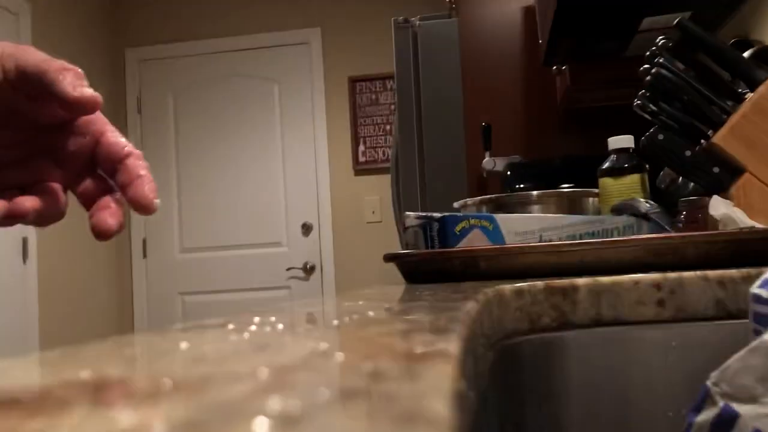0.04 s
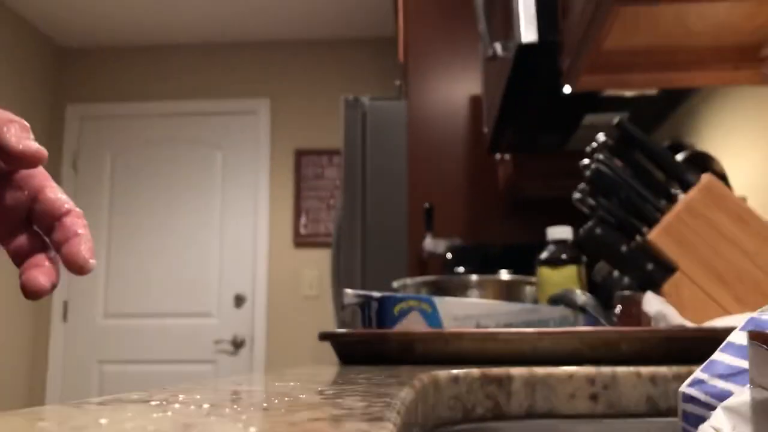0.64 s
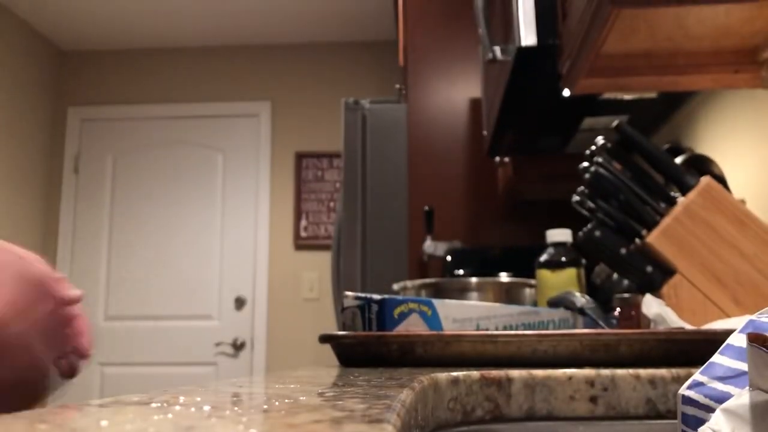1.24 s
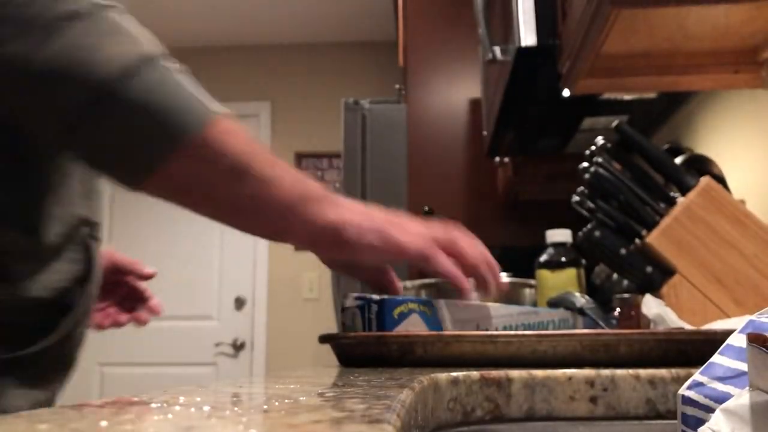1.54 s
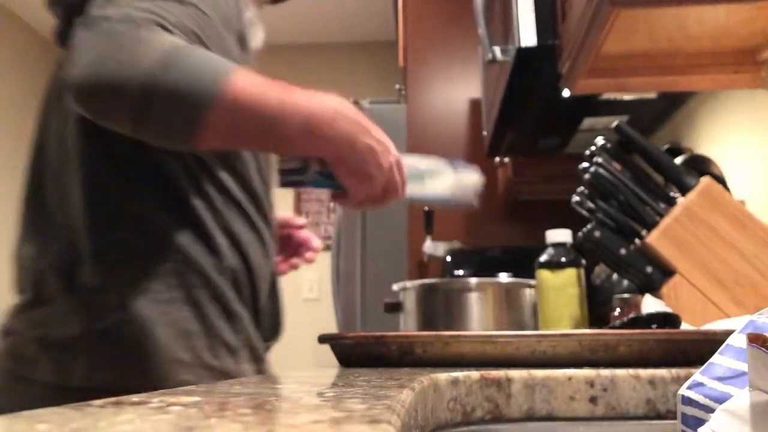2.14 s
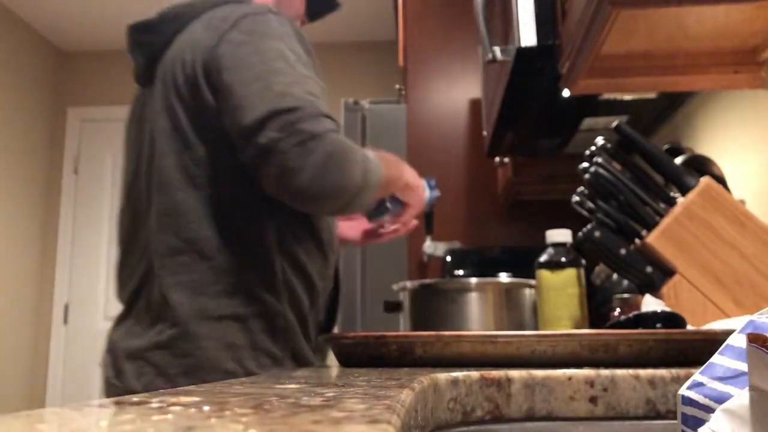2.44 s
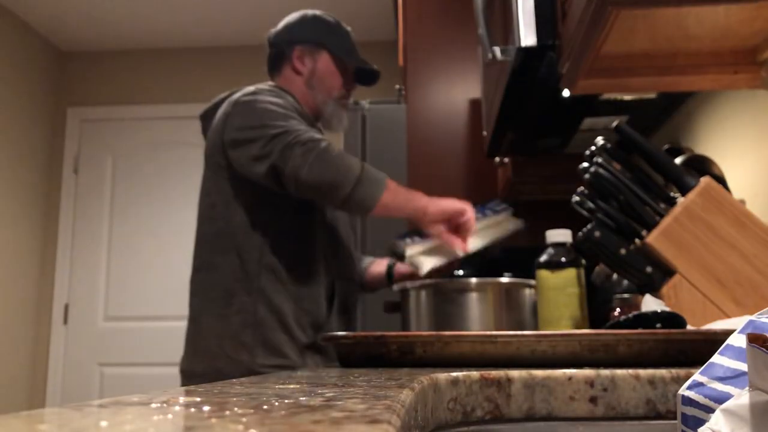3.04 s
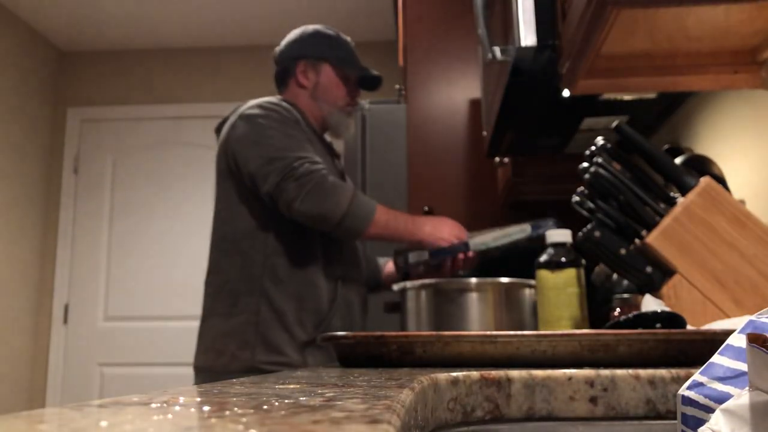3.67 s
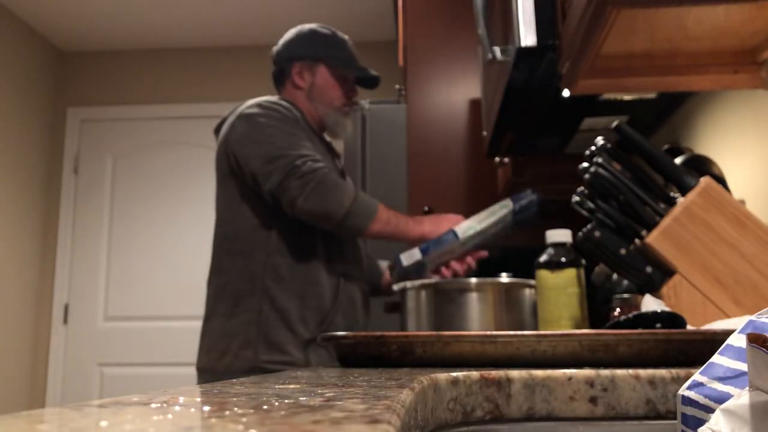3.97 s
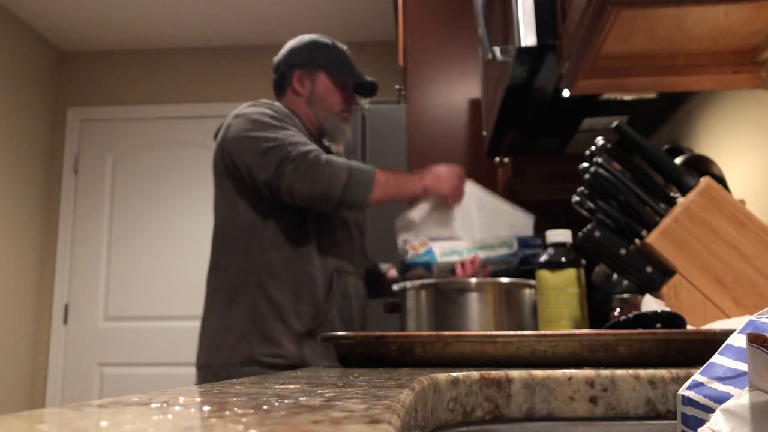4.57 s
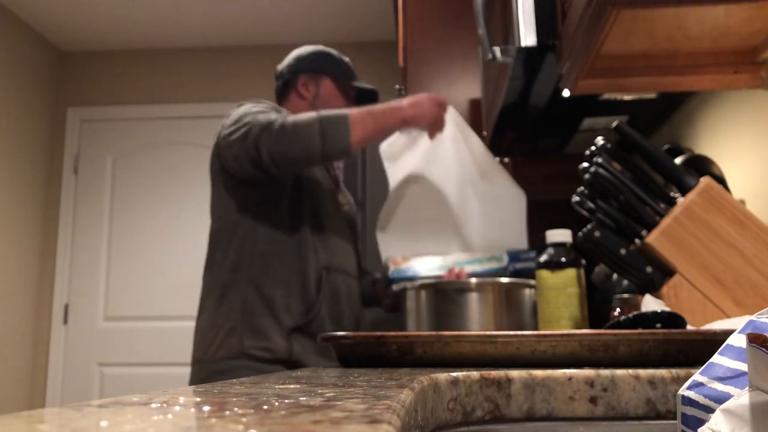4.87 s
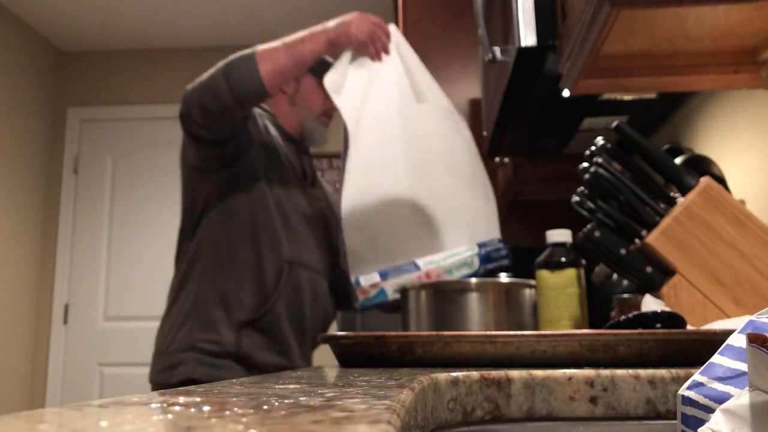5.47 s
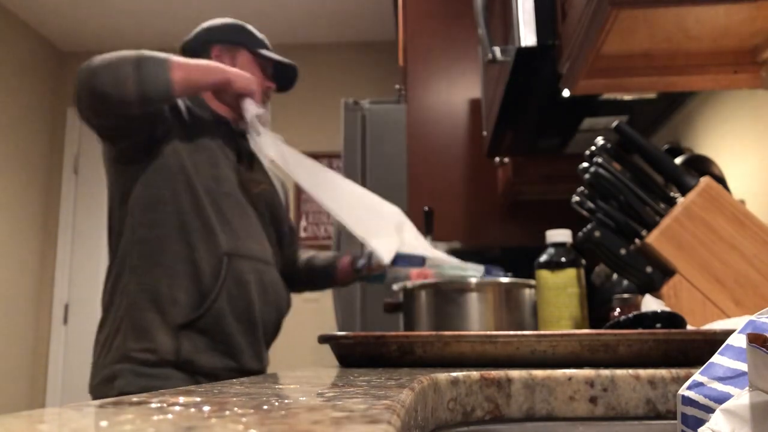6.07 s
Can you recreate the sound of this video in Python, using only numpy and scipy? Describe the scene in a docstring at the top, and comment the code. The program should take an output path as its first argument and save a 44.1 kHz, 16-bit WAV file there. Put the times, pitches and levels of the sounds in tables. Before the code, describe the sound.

A carton of baking paper is picked up with a sharp clank against a metal pan, after light handling ticks on the nearby microphone and a few dull steps. Hollow taps, scrapes and soft thuds follow as the box is turned and opened. The sheet rustles steadily out, then rips loudly along the toothed edge. A fridge hums quietly beneath it all in a slightly echoing kitchen.

```python
"""A kitchen with hard walls that ring briefly. A phone is settled on the counter; someone steps up and
lifts a carton of baking parchment, which knocks against a metal pan and sets its modes ringing.
Fingers tap and rub the hollow carton as it is turned and opened. The sheet slides off the roll in
countless tiny slips, then its fibres snap along the toothed edge. A fridge hums throughout."""
import sys
import numpy as np
from scipy import signal
from scipy.fft import rfft, irfft
from scipy.io import wavfile
from scipy.ndimage import uniform_filter1d

SR = 44100
rng = np.random.default_rng(int(sys.argv[2]) if len(sys.argv) > 2 else 0)


def persist_wave(psi):
    """Save psi, clipped to +-1, as 16-bit WAV."""
    counts = np.round(np.clip(psi, -1, 1) * 32767).astype(np.int16)
    wavfile.write(sys.argv[1], SR, np.atleast_2d(counts).T)


N = 278271
T = np.arange(N) / SR
AGE = T[:SR // 2]  # time since a blow


# tearing spectrum: f/Hz, gain/dB
RIP_SPECTRUM = [(60, -49), (120, -21), (200, -1.5), (270, -7), (390, -10), (560, -7), (950, 0.5),
                (1610, -5), (1910, -1), (2450, -4.5), (2900, 0), (7000, -2), (9500, -6), (16000, -8.5)]
# tugs along the teeth: t/s, length/s, level/dB
TUGS = [(5.85, 0.1, -42), (5.925, 0.015, -22.5), (5.97, 0.11, -13), (6.125, 0.11, -15.5),
        (6.235, 0.035, -24), (6.275, 0.05, -10.5)]
# single teeth punching through: t/s, level/dB
PUNCTURES = [(5.862, -32.5), (5.897, -32), (5.937, -28), (5.997, -26), (6.0546, -7), (6.1648, -21),
             (6.2873, -8)]

def ripping():
    """Fibres snap in bunches as the tear runs from tooth to tooth; taut sheet and carton radiate."""
    surge_db = 1.36 * walk(220) + 0.5 * walk(99)
    fibres = slips(per_s=7700, spread_db=1) * undb(surge_db)
    sheet = unit(colour(fibres, RIP_SPECTRUM))
    walls = undb(-14.5) * unit(hollow(slips(per_s=3300, spread_db=2.5)))
    flutter = undb(-25.5) * unit(resonate(cut(fibres, 310, "low"), 229, 35))
    tension = strokes(TUGS, attack_s=0.038, release_s=0.062)[0]
    out = tension * (sheet + walls + flutter)
    for t, db in PUNCTURES:
        add(out, t, undb(db) * unit_hit(cut(burst(0.027), 1400, "high")))
    return kitchen(out, wet_db=-10.5)


# pace of the pull, as a treble gain: t/s, level/dB
PULL_PACE = [(4.38, -52), (4.416, -58), (4.44, -41.5), (4.646, -37), (4.732, -42), (4.752, -38.5),
             (4.78, -43.5), (4.9, -39), (5.042, -46.5), (5.218, -33), (5.414, -42), (5.432, -39.5),
             (5.542, -50), (5.668, -38.5), (5.734, -45), (5.85, -71)]
# sliding-paper spectrum: f/Hz, gain/dB
SLIDE_SPECTRUM = [(150, -15.5), (420, -14), (900, -0.5), (2200, -1), (3000, 2.5), (4200, -0.5),
                  (6000, -1.5), (8000, -5.5), (10000, -13), (16000, -44)]
# free-sheet resonances: f/Hz, width/Hz, level/dB re hiss
SHEET_BANDS = [(1450, 810, -13), (3040, 1100, -13.5), (5600, 1700, -11)]

def unrolling():
    """The sheet slips over the carton's edge, brighter when faster; the turning roll rubs the walls."""
    mid_pace_db, hiss_follow = -35, 0.24
    growth_db_per_s = 4  # a longer sheet radiates more
    times, treble_db = np.transpose(PULL_PACE)
    start, end = times[0], times[-1]
    pace_db = np.interp(T, times, treble_db) - mid_pace_db
    drawn_s = np.clip(T, start, end) - start
    pull = stroke(start, end - start, attack_s=0.039, release_s=0.6) * undb(1.24 * walk(50))
    creases = undb(-10) * slips(per_s=110, spread_db=-0.5)
    friction = slips(per_s=18000, spread_db=2.5) + creases
    hiss = unit(colour(friction, SLIDE_SPECTRUM))
    for hz, width_hz, db in SHEET_BANDS:
        bend_db = 4.5 * walk(16)
        hiss += undb(db + bend_db) * unit(resonate(slips(per_s=3000, spread_db=3), hz, width_hz))
    fine_slips = slips(per_s=20000, spread_db=-0.5)
    sheen = unit(cut(cut(fine_slips, 3800, "high"), 3800, "high"))
    roll = unit(hollow(slips(per_s=5200, spread_db=1.5))) * undb(1.1 * walk(23))
    out = undb(-40.5 + hiss_follow * pace_db + growth_db_per_s * drawn_s) * hiss
    out += undb(-31.5 + pace_db) * sheen + undb(-44) * roll
    return kitchen(pull * out, wet_db=-13)


# carton on pan, levels ahead of the low-pass: t/s, crack/dB, ring/dB, low-pass/Hz
KNOCKS = [(2.0747, -10.5, -21.5, 11800), (2.095, -7.5, -23, 710), (2.146, -36, -26.5, 485),
          (2.1935, -17.5, -30, 4800), (2.256, -24, -32, 1700), (2.274, -27, -35, 920)]
# pan modes: f/Hz, level/dB, free t60/s
PAN_MODES = [(130.7, -12, 0.29), (193.5, -12, 0.25), (219.5, -9, 0.19), (353.4, -9, 0.32), (366, -6, 0.22),
             (547.6, -14, 0.56), (688, -19, 0.57), (709, 2, 0.13), (864, -22, 0.19), (925, -1, 0.18),
             (1010, -19, 0.26), (1190, -2.5, 0.21), (1490, -31.5, 0.28), (1982, -4.5, 0.16),
             (2160, -18.5, 0.24), (2700, -8, 0.14), (3140, 4, 0.054), (3200, 6, 0.014)]
# contact spectrum: f/Hz, gain/dB
CRACK_SPECTRUM = [(100, -20.5), (400, -5), (900, 5.5), (1500, 2), (3100, 3.5), (4500, -1.5), (6500, -5.5),
                  (9000, -11), (13000, -12.5), (16000, -7.5)]

def knocks():
    """The carton cracks against the pan and bounces; the pan chatters and rings, the roll clatters."""
    cracks, rings = np.zeros(N), np.zeros(N)
    carton_damping = fade(1.9)
    for t, crack_db, ring_db, contact_hz in KNOCKS:
        force = (burst(0.058) + undb(-10.5) * burst(0.2)) * rise(0.0055)  # cardboard yields
        crack = unit_hit(colour(force, CRACK_SPECTRUM))
        clatter = undb(-8.5) * unit_hit(cut(cut(burst(0.139), 920, "low"), 97, "high"))
        ring = np.zeros(len(AGE))
        for hz, db, t60_s in PAN_MODES:
            chatter = burst(0.43 * t60_s)
            width_hz = np.log(1000) / (np.pi * t60_s)
            ring += undb(db) * unit_hit(resonate(chatter, hz, width_hz))
        add(cracks, t, undb(crack_db) * cut(crack, contact_hz, "low"))
        add(rings, t, undb(ring_db) * cut(ring * carton_damping + clatter, contact_hz, "low"))
    return kitchen(cracks, wet_db=-8) + kitchen(rings, wet_db=-16.5)


# taps and flicks on carton, lid and sheet: t/s, body/dB, panel f/Hz, snap/dB, t60/s
TAPS = [(1.482, -30, 570, -60, 0.11), (1.667, -28, 870, -43, 0.11), (1.744, -26, 955, -38, 0.044),
        (1.792, -42, 900, -32.5, 0.051), (2.444, -25.5, 1085, -52, 0.076),
        (2.625, -36.5, 1170, -50.5, 0.13), (2.665, -25.5, 1080, -43.5, 0.042),
        (2.688, -28.5, 1210, -57, 0.071), (3.009, -42, 1340, -36, 0.05), (3.149, -24, 1010, -38, 0.047),
        (3.179, -21.5, 745, -35, 0.064), (3.307, -28, 1140, -47, 0.08), (3.585, -27.5, 590, -54, 0.14),
        (3.633, -33, 610, -44, 0.14), (4.048, -43, 567, -39, 0.063), (4.264, -37, 1630, -25.5, 0.083),
        (4.276, -33, 1160, -23.5, 0.04), (4.407, -24.5, 1070, -38, 0.15), (4.551, -20.5, 983, -32.5, 0.045),
        (4.629, -25, 960, -25.5, 0.11), (4.675, -25.5, 990, -30, 0.08), (5.091, -27, 1036, -31.5, 0.18),
        (5.299, -21.5, 918, -35, 0.017), (5.502, -27, 900, -28, 0.095), (5.59, -27, 950, -26.5, 0.23)]
# contact and rubbing spectrum: f/Hz, gain/dB
SCRAPE_SPECTRUM = [(1000, -8), (2000, 1), (3000, 4.5), (5200, 1.5), (7000, -2.5), (10000, -6.5),
                   (13000, -7.5), (16000, -6.5)]

def taps():
    """Each tap snaps at the surface, rings the lid's stiff edge and rattles the panel it meets."""
    out = np.zeros(N)
    for t, body_db, hz, snap_db, t60_s in TAPS:
        panel = undb(-10) * unit_hit(resonate_twice(burst(t60_s), hz, 160))
        walls = undb(-12) * unit_hit(hollow(burst(t60_s)))
        force = burst(t60_s) * rise(0.0036)
        surface = undb(-5) * unit_hit(colour(force, SCRAPE_SPECTRUM))
        lid = undb(-16.5) * unit_hit(resonate(force, 3070, 600))
        add(out, t, undb(body_db) * (panel + walls) + undb(snap_db) * (surface + lid))
    return kitchen(out, wet_db=-3.5)


# two sleeve rustles, then fingers on cardboard: t/s, length/s, scrape/dB, body/dB
RUBS = [(1.33, 0.12, -68.5, -50.5), (1.48, 0.11, -71, -57), (1.665, 0.09, -52.5, -37.5),
        (1.785, 0.027, -46.5, -34), (1.865, 0.022, -44.5, -36.5), (1.97, 0.1, -49, -43),
        (2.04, 0.024, -38.5, -37), (2.39, 0.065, -61, -46.5), (2.5, 0.22, -67, -53),
        (2.66, 0.085, -61.5, -44.5), (2.79, 0.25, -64, -50), (3.04, 0.27, -50, -43),
        (3.185, 0.14, -45.5, -36.5), (3.34, 0.085, -48.5, -43.5), (3.44, 0.089, -56, -50.5),
        (3.675, 0.082, -51, -39.5), (3.81, 0.21, -52, -49), (4.02, 0.24, -47.5, -49),
        (4.28, 0.32, -43.5, -41)]

def rustles_and_rubs():
    """A sleeve rustles as someone steps up, then fingers stroke the cardboard."""
    lifted_s = 2.9  # until then the carton drags on the pan, which hums one note
    scrape_gain, body_gain = strokes(RUBS, attack_s=0.021, release_s=0.03)
    scrape = unit(colour(slips(per_s=1600, spread_db=-3), SCRAPE_SPECTRUM)) * undb(2 * walk(45))
    rubbing = slips(per_s=2000, spread_db=2.5) * undb(0.5 * walk(30))
    walls = unit(hollow(rubbing)) + undb(-15.5) * unit(resonate_twice(rubbing, 1370, 483))
    drag = unit(resonate_twice(slips(per_s=540, spread_db=6.5), 630, 80)) * (T < lifted_s)
    body = undb(-6.5) * walls + undb(-10.5) * drag
    return kitchen(scrape_gain * scrape + body_gain * body, wet_db=-3)


# carton resonances: f/Hz, half-width per stage/Hz, gain/dB
CARTON_MODES = [(181.4, 73, 2.5), (607, 86, 2), (733, 88, 6), (986, 72, 4.5), (1135, 250, 6.5),
                (1530, 350, -7)]

def hollow(force):
    """The carton's walls and cavity resonate under a force."""
    return sum(undb(db) * resonate_twice(force, hz, 2 * half_hz) for hz, half_hz, db in CARTON_MODES)


# footfalls and the roll shifting in its carton: t/s, level/dB, f/Hz
THUDS = [(1.346, -35, 146), (1.379, -38.5, 196), (1.484, -36.5, 218), (1.518, -35, 120),
         (1.672, -32.5, 138), (1.816, -40, 187), (3.086, -39, 141), (3.176, -27, 196), (3.261, -34, 165),
         (3.307, -33, 193), (3.632, -40.5, 175), (3.855, -32, 187), (4.107, -40.5, 168), (5.54, -39, 110)]

def thuds():
    """Soft, heavy contacts: one low swing with a dull rumble."""
    t60_s = 0.1
    out = np.zeros(N)
    for t, db, hz in THUDS:
        force = burst(t60_s) * rise(0.3)
        rumble = undb(-6) * unit_hit(cut(cut(force, 360, "low"), 61, "high"))
        thump = undb(-4.5) * swing(hz, t60_s, rise_t60_s=0.058)
        add(out, t, undb(db) * (thump + rumble))
    return kitchen(out, wet_db=-12)


# fingers sliding on the case: t/s, length/s, hiss/dB, creak/dB
GRIPS = [(0.27, 0.05, -77, -51), (0.31, 0.06, -61.5, -63), (0.41, 0.051, -63.5, -63),
         (0.535, 0.036, -60, -62)]
# fingers ticking on the case: t/s, level/dB, f/Hz
CASE_TICKS = [(0.0532, -50.5, 1890), (0.0996, -57, 1730), (0.111, -57, 2000), (0.118, -49.5, 2600),
              (0.174, -64, 1800), (0.214, -54, 2900), (0.241, -59, 2000), (0.256, -53, 1540),
              (0.2773, -59, 1880), (0.312, -53, 1390), (0.3547, -53, 5450), (0.408, -44.5, 5900),
              (0.439, -58, 5000), (0.5218, -58, 4020)]
# phone on counter: t/s, swing/dB, f/Hz, t60/s, clack/dB
PHONE_BUMPS = [(0.257, -50, 305, 0.046, -41.5), (0.315, -41, 130, 0.044, -41.5),
               (0.42, -35.5, 97, 0.081, -48.5), (0.571, -41, 220, 0.069, -31),
               (0.592, -36, 128, 0.027, -55)]

def phone():
    """Rubs, ticks and soft bumps reach the microphone through the case."""
    hiss_gain, creak_gain = strokes(GRIPS, attack_s=0.015, release_s=0.0067)
    hiss = unit(colour(slips(per_s=9000, spread_db=5), SCRAPE_SPECTRUM))
    creak = unit(cut(resonate(slips(per_s=890, spread_db=6.5), 580, 500), 1400, "low"))
    out = hiss_gain * hiss + creak_gain * creak
    for t, db, hz in CASE_TICKS:
        force = cut(burst(0.014), 770, "high")
        ring = undb(-2) * unit_hit(resonate(force, hz, 0.25 * hz))
        click = undb(-3) * unit_hit(cut(force, 3700, "low"))
        add(out, t, undb(db) * (ring + click))
    for t, swing_db, hz, t60_s, clack_db in PHONE_BUMPS:
        clack = unit_hit(resonate(cut(burst(0.0093), 1070, "low"), 800, 1000))
        add(out, t, undb(swing_db) * swing(hz, t60_s, rise_t60_s=0.017) + undb(clack_db) * clack)
    return out


# kitchen air spectrum: f/Hz, gain/dB
AIR_SPECTRUM = [(25, -28), (50, 1.5), (130, 1.5), (200, -1), (300, -5), (600, -6.5), (1100, -10.5),
                (1700, -20), (2600, -26.5), (4500, -29), (7000, -30.5), (10000, -36.5), (16000, -35)]

def fridge():
    """Low moving air and the compressor's mains hum."""
    air_db, hum_db, hum_hz = -54, -58, 122
    air = unit(colour(rng.standard_normal(N), AIR_SPECTRUM)) * undb(0.8 * walk(5))
    hum = np.sqrt(2) * np.sin(2 * np.pi * hum_hz * T) * undb(0.54 * walk(2.76))
    return undb(air_db) * air + undb(hum_db) * hum


# room decay: f/Hz, t60/s
ROOM_DECAY = [(125, 0.98), (500, 0.76), (2000, 0.59), (6000, 0.44), (15000, 0.49)]

def kitchen(x, wet_db):
    """Direct sound plus dense reflections; the treble dies first."""
    hz, t60_s = np.transpose(ROOM_DECAY)
    f, t, cells = signal.stft(rng.standard_normal((2, len(AGE))), SR, nperseg=256)
    band_t60_s = np.interp(np.log(f + 1), np.log(hz), t60_s)
    decay = np.exp(-np.log(1000) * t / band_t60_s[:, None])
    tails = signal.istft(cells * decay, SR)[1][:, :len(AGE)] * rise(0.018)
    tails /= np.linalg.norm(tails, axis=1, keepdims=True)
    here, there = signal.fftconvolve(x[None], tails, axes=1)[:, :N]
    turn = 2 * np.pi * 0.781 * T  # moving hands shift the echo pattern
    echo = np.cos(turn) * here + np.sin(turn) * there
    return (x + undb(wet_db) * echo) / np.sqrt(1 + undb(2 * wet_db))


def slips(per_s, spread_db):
    """Stick-slip friction: random clicks of either sign and uneven size, rms 1."""
    chance = rng.uniform(-1, 1, N) * SR / per_s
    at = np.flatnonzero(np.abs(chance) < 1)
    size_db = -spread_db * np.log(np.maximum(np.abs(chance[at]), 1 / 200))
    out = np.zeros(N)
    out[at] = np.sign(chance[at]) * undb(size_db)
    return unit(out)


def stroke(start_s, length_s, attack_s, release_s):
    """One movement: builds, holds, dies away."""
    dying = np.clip((T - start_s - length_s) / release_s, 0, 40)
    return np.clip((T - start_s) / attack_s, 0, 1) * np.exp(-dying)


def strokes(table, attack_s, release_s):
    """One gain curve per dB column; overlapping strokes add in power."""
    rows = np.array(table)
    shapes = np.array([stroke(t, length_s, attack_s, release_s) for t, length_s in rows[:, :2]])
    return np.sqrt(undb(rows[:, 2:].T) ** 2 @ shapes ** 2)


def swing(hz, t60_s, rise_t60_s):
    """Damped sine with a soft onset."""
    return unit_hit(np.sin(2 * np.pi * hz * AGE) * fade(t60_s) * rise(rise_t60_s))


def burst(t60_s):
    """Decaying noise."""
    return rng.standard_normal(len(AGE)) * fade(t60_s)


def fade(t60_s):
    """Decay of 60 dB in t60_s."""
    return np.exp(-np.minimum(np.log(1000) * AGE / t60_s, 40))


def rise(t60_s):
    """Onset from 0 towards 1."""
    return 1 - fade(t60_s)


def walk(per_s):
    """Random drift, spread near 1."""
    knots = rng.standard_normal(4096)
    return np.interp(T * per_s, np.arange(len(knots)), knots)


def colour(x, spectrum):
    """Minimum-phase filter through (f/Hz, gain/dB) points."""
    size = 4096
    hz, db = np.transpose(spectrum)
    bins_hz = np.arange(size // 2 + 1) * SR / size
    log_gain = np.log(undb(np.interp(np.log(bins_hz + 1), np.log(hz), db)))
    cepstrum = irfft(log_gain) * (1 + np.sign(size / 2 - np.arange(size)))
    cepstrum[0] /= 2
    impulse = irfft(np.exp(rfft(cepstrum)))
    return signal.fftconvolve(x, impulse)[:len(x)]


def resonate(x, hz, width_hz):
    """One resonance, gain 1 at its centre."""
    return signal.lfilter(*signal.iirpeak(hz, hz / width_hz, fs=SR), x)


def resonate_twice(x, hz, width_hz):
    """Two equal resonances in series."""
    return resonate(resonate(x, hz, width_hz), hz, width_hz)


def cut(x, hz, kind):
    """Second-order low-pass or high-pass."""
    return signal.sosfilt(signal.butter(2, hz, kind, fs=SR, output="sos"), x)


def undb(db):
    """Decibels to gain."""
    return np.exp(np.asarray(db) * (np.log(10) / 20))


def unit(x):
    """Scale to rms 1."""
    return x / np.sqrt(np.mean(x ** 2))


def unit_hit(x):
    """Scale the loudest 3 ms to rms 1."""
    return x / np.sqrt(uniform_filter1d(x ** 2, size=132).max())


def add(out, start_s, x):
    """Mix x into out from start_s on."""
    i = int(start_s * SR)
    out[i:i + len(x)] += x[:N - i]


def scene():
    """All sources at one microphone, alike in both channels."""
    mono = phone() + thuds() + taps() + knocks() + rustles_and_rubs() + unrolling() + ripping() + fridge()
    return np.array([mono, mono])


def record(dry):
    """The phone thins the deepest bass, rounds the peaks and cuts the top treble."""
    bass_hz, drive, top_hz = 40, 1.15, 16200
    rounded = np.tanh(drive * cut(dry, bass_hz, "high")) / drive
    return signal.sosfilt(signal.ellip(10, 0.2, 80, top_hz, fs=SR, output="sos"), rounded)


dry = scene()
out = record(dry)
persist_wave(out)
```